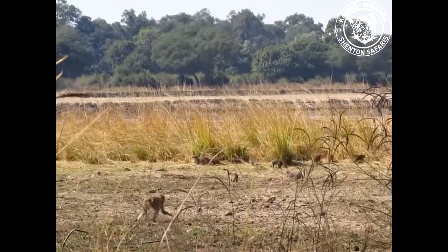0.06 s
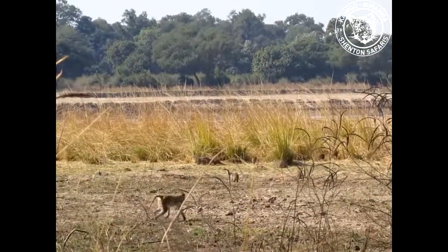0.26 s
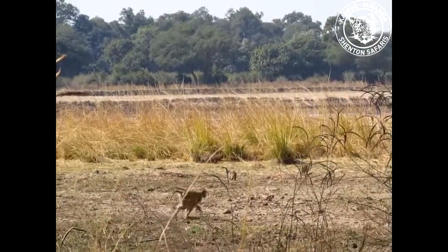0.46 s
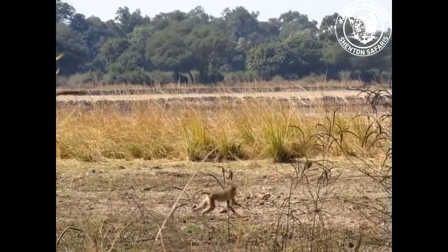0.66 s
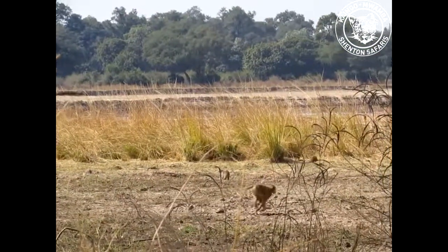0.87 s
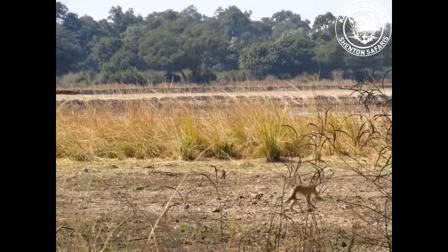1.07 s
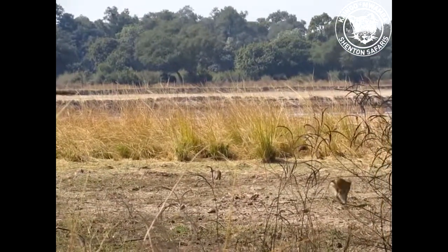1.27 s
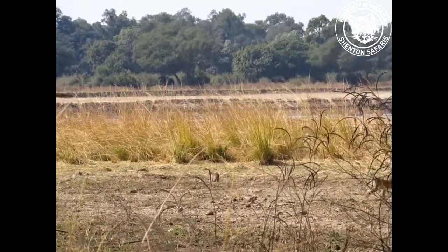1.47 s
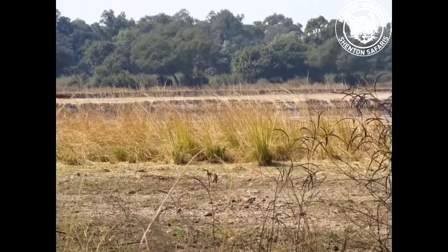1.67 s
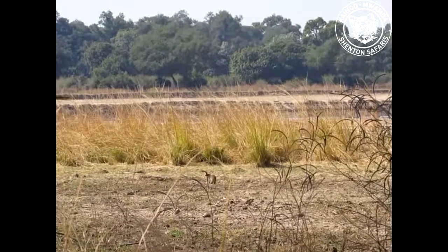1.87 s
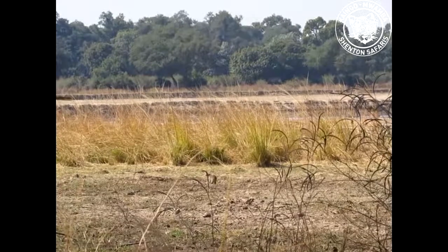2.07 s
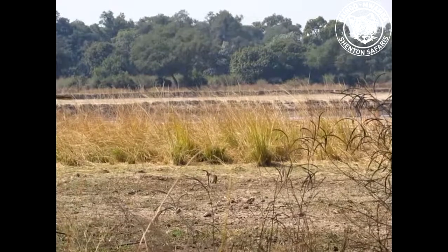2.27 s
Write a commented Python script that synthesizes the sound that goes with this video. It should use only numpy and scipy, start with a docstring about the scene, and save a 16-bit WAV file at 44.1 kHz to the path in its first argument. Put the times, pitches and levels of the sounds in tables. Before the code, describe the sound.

A bird close on the left gives six sharp, whistled chirps, the last three quieter, each echoing briefly off the bush. Light wind hisses through open grassland, with faint cooing far away and soft puffs on the microphone.

```python
"""A bird close by on the left gives six sharp chirps in open savanna. Each is a whistle that starts
with a rough snap, arches up in pitch and dives, then scatters back from the bush as echoes.
Far off are a few faint calls (gliding tones) and a steady chorus of low cooing (bands of noise).
Light wind hisses in the grass and nudges the microphone with soft, low puffs."""
import sys
import numpy as np
from scipy import signal
from scipy.fft import rfft, irfft
from scipy.io import wavfile

SR = 44100
rng = np.random.default_rng(int(sys.argv[2]) if len(sys.argv) > 2 else 0)


def to_wav(sig):
    """Store sig (one row per channel, or 1-D mono) as 16-bit WAV at the path in sys.argv[1].

    Samples outside -1..1 are clipped; the rate is SR.
    """
    pcm = np.clip(np.atleast_2d(sig), -1, 1) * 32767
    pcm = np.round(pcm).astype(np.int16)
    wavfile.write(sys.argv[1], SR, pcm.T)  # frames by channels


N = 101429

# The near bird's chirps. Overtones are tones at 2, 3 and 4 times the pitch of the base tone.
# (start [s], peak time [s], end [s], start pitch [Hz], peak pitch [Hz], level [dB],
#  swell in the rise [dB], fade in the dive [dB], overtone gain [dB], step per further overtone [dB],
#  snap gain [dB], left minus right [dB], echo of base tone and snap [dB], echo of overtones [dB])
CHIRPS = [(.2192, .257, .293, 2780, 3335, -14, 10, 20, 2, -1, -13, 9, -3, -1),
          (.8060, .850, .885, 2680, 3320, -14, 21, 19, -6, 0, -17, 11, -5, 3),
          (.9842, 1.005, 1.037, 2790, 3130, -19, 1, 10, 3, 2, -7, 9, -3, -4),
          (1.5368, 1.582, 1.622, 2420, 3265, -22, 0, 0, -3, -4, -11, 6, 0, 2),
          (1.7270, 1.749, 1.781, 2620, 3060, -28, -2, -3, -1, -1, -10, 6, 2, 4),
          (1.9040, 1.926, 1.960, 2660, 3040, -29, -2, -4, -1, -1, -10, 6, 3, 5)]
# How loud the chirp's tones sound at each frequency, as coloured by bird and microphone:
# (frequency [Hz], gain [dB])
CHIRP_COLOUR = [(1600, -13), (2400, -8.5), (3200, -2), (3650, -10), (4000, -21), (4500, -27.5),
                (5400, -12.5), (6400, -15.5), (7800, -23), (9100, -24), (10100, -39.5), (12400, -34.5),
                (13200, -51)]
# Distant calls: (start [s], length [s], start pitch [Hz], middle pitch [Hz], end pitch [Hz], level [dB])
FAR_CALLS = [(1.037, .11, 1946, 1950, 1550, -48), (1.984, 0.042, 790, 833, 750, -43.5),
             (2.021, 0.071, 700, 626, 543, -57)]
# Bands of distant cooing: (pitch [Hz], width [Hz], level [dB])
COO_BANDS = [(278, 35, -68.5), (486.6, 34, -61.5), (530, 64, -60.5), (680.7, 55, -52.5)]
# Tone colour of the wind in the grass: (frequency [Hz], relative level [dB])
WIND_SPECTRUM = [(25, -6), (70, -9.5), (150, -1), (250, -3), (400, 0), (560, -7), (800, -1), (1020, -6.5),
                 (1300, -4.5), (1600, -10), (2400, -10), (3200, -10.5), (3900, -16), (5000, -17.5),
                 (7000, -19), (10000, -24.5), (12500, -25.5), (14500, -40)]
# How alike that wind is on the left and right: (frequency [Hz], likeness [-1 opposite to 1 same])
WIND_LIKENESS = [(30, -0.84), (150, -0.95), (350, -0.86), (550, -1.16), (800, -0.21), (1400, -0.052),
                 (3000, 0.46), (12000, -0.077)]
# Puffs of wind on the microphone: (peak time [s], level [dB])
WIND_PUFFS = [(1.32, -51), (1.74, -53.5), (1.89, -38), (2.25, -49.5)]
# Narrow bands that the microphone misses: (frequency [Hz], width [Hz])
MIC_DIPS = [(3980, 216), (7930, 180)]

T = np.arange(N) / SR  # time of each sample [s]
BIN_HZ = np.maximum(np.arange(N + 1) * SR / (2 * N), 1)  # frequencies at which noise is shaped


def bird():
    """The bird snaps and whistles. Returns the direct sound and the sound that spreads into the bush."""
    direct, spread = np.zeros((2, N)), np.zeros(N)
    wobbles = drift(320), drift(50), drift(200)
    rasp = 1 + amp(-41) * drift(1000)
    noise = rng.standard_normal(N)
    for (start, peak, end, start_hz, peak_hz, db, swell_db, fade_db,
         overtone_db, step_db, snap_db, pan_db, echo_db, upper_echo_db) in CHIRPS:
        base, *overtones = rasp * whistle(start, peak, end, start_hz, peak_hz, swell_db, fade_db, wobbles)
        lower = base + amp(snap_db) * snap(start, noise)
        upper = sum(amp(overtone_db + k * step_db) * tone for k, tone in enumerate(overtones))
        direct += amp(db) * pan(pan_db) * (lower + upper)
        spread += amp(db + echo_db) * lower + amp(db + upper_echo_db) * upper
    return direct, spread


def whistle(start, peak, end, start_hz, peak_hz, swell_db, fade_db, wobbles):
    """A base tone and three overtones arch up in pitch, then dive; their strength varies with pitch."""
    end_hz, attack_s, release_s = 1534.5, 0.0024, 0.0023
    waver, flutter, shimmer = wobbles  # of the pitch, the level and the overtones' level
    rise_left = np.clip((peak - T) / (peak - start), 0, 1)
    dive = np.clip((T - peak) / (end - peak), 0, 1)
    arch_hz = peak_hz - (peak_hz - start_hz) * rise_left ** 1.55 - (peak_hz - end_hz) * dive ** 2.1
    hz = arch_hz * (1 + .0035 * waver)
    gate = np.clip((T - start) / attack_s, 0, 1) * np.clip((end - T) / release_s, 0, 1)
    on = gate > 0
    phase = 2 * np.pi * np.cumsum(hz[on]) / SR
    base_db = -swell_db * rise_left[on] ** 2
    shared_db = 0.6 * flutter[on] - fade_db * dive[on] ** 2.28  # the fade comes late in the dive
    # Overtones waver more, follow only part of the swell and die first in the dive.
    upper_db = 3 * shimmer[on] + 0.55 * base_db - 3.5 * dive[on]
    tones = np.zeros((4, N))
    for k, tone in enumerate(tones, 1):
        db = at_hz(CHIRP_COLOUR, k * hz[on]) + shared_db + (upper_db if k > 1 else base_db)
        tone[on] = amp(db) * np.sin(k * phase)
    return tones * gate


def snap(start, noise, decay_s=0.0033, band_hz=(1870, 7400)):
    """A brief, rough click as the voice catches at the start of a chirp."""
    burst = noise * (T >= start) * np.exp(-np.abs(T - start) / decay_s)
    return cut(burst + 1e-18, band_hz, "band")


def bush_echoes(sound, first_echo_s=0.0045, build_s=0.026, near_per_s=4200, treble_hz=4700):
    """Nearby brush sends back separate early echoes; a long, smooth tail builds up behind them."""
    age = np.maximum(T - first_echo_s, 0)

    def echoes(shape, ring_s):
        """Random reflections that fall by 60 dB in ring_s; energy 1 on each side."""
        train = rng.standard_normal((2, N)) * shape * amp(-60 * age / ring_s)
        return train / np.sqrt(np.sum(train ** 2, axis=1, keepdims=True))

    build = 1 - np.exp(-age / build_s)
    arrivals = (rng.random((2, N)) < near_per_s / SR) * (age > 0)
    near = amp(-3.5) * pan(6) * echoes(arrivals, ring_s=0.34)  # the nearest brush is on the bird's side
    tail = amp(-4) * cut(echoes(build, ring_s=0.75), treble_hz, "low")
    treble = amp(-4.5) * cut(echoes(build, ring_s=0.48), treble_hz, "high")  # treble dies sooner
    response = cut(near + tail + treble, hz=2470, kind="high")  # leaves scatter high tones best
    return signal.fftconvolve(sound[None], response, axes=1)[:, :N]


def far_calls():
    """Far birds give faint, arched notes, blurred by distance."""
    calls = np.zeros(N)
    blur = 1 + .022 * drift(123)  # a quick wobble in pitch
    for start, length, start_hz, middle_hz, end_hz, db in FAR_CALLS:
        progress = np.clip((T - start) / length, 0, 1)
        arch = np.polyfit([0, .5, 1], [start_hz, middle_hz, end_hz], 2)
        hz = np.polyval(arch, progress) * blur
        calls += amp(db) * np.sin(np.pi * progress) * np.sin(2 * np.pi * np.cumsum(hz) / SR)
    return calls


def cooing_chorus():
    """Many far cooing voices blur into a few narrow, wavering bands, a little to the right."""
    voices = np.zeros((2, N))
    for pitch, width, db in COO_BANDS:
        band = 1 / (1 + ((BIN_HZ - pitch) / width * 1.5) ** 2)
        voices += amp(db + 2.1 * drift(2.3)) * stereo_noise(band, likeness=.7)
    return pan(-2.5) * voices


def grass_wind(level_db=-47.5):
    """Light wind hisses steadily in the grass and trees."""
    colour = amp(at_hz(WIND_SPECTRUM, BIN_HZ))
    return amp(level_db + .5 * drift(12)) * stereo_noise(colour, at_hz(WIND_LIKENESS, BIN_HZ))


def wind_puffs(rise_s=0.053, fall_s=0.064, centre_hz=34.6, half_width_hz=40):
    """Soft, low puffs on the microphone push its two sides in opposite directions."""
    swell = sum(amp(db) * np.exp(-np.maximum((peak - T) / rise_s, (T - peak) / fall_s))
                for peak, db in WIND_PUFFS)
    low_band = 1 / (1 + ((BIN_HZ - centre_hz) / half_width_hz) ** 4)
    return swell * stereo_noise(low_band, likeness=-.95)


def amp(db):
    """Turn decibels into a gain to multiply by."""
    return 10 ** (np.asarray(db) / 20)


def unit(x):
    """Scale a signal to an average strength (rms) of 1."""
    return x / np.sqrt(np.mean(x ** 2) + 1e-20)


def at_hz(points, hz):
    """Read between the rows of a table, on a log-frequency axis."""
    frequencies, values = np.transpose(points)
    return np.interp(np.log(hz), np.log(frequencies), values)


def drift(rate_hz):
    """A smooth random wobble of strength 1; a higher rate makes it quicker."""
    pole = np.exp(-2 * np.pi * rate_hz / SR)
    return unit(signal.lfilter([1], [1, -2 * pole, pole * pole], rng.standard_normal(2 * N))[N:])


def pan(db):
    """Left and right gains; positive decibels move the sound to the left."""
    return amp(np.array([[db / 2], [-db / 2]]))


def stereo_noise(colour, likeness):
    """Noise of strength 1 with a given tone colour and likeness between left and right."""
    mid, side = rfft(rng.standard_normal((2, 2 * N)))
    likeness = np.clip(likeness, -.99, .99)
    spectrum = np.sqrt(1 + likeness) * mid + np.sqrt(1 - likeness) * side * [[1], [-1]]
    return unit(irfft(colour * spectrum)[:, :N])


def cut(x, hz, kind):
    """A filter that keeps the "low" part, the "high" part or one "band" of a sound."""
    return signal.sosfilt(signal.butter(3, hz, kind, fs=SR, output="sos"), x)


def scene():
    """Add up the bird, its echoes, the far voices and the wind."""
    direct, spread = bird()
    return direct + bush_echoes(spread) + far_calls() + grass_wind() + cooing_chorus() + wind_puffs()


def record(dry):
    """The microphone has two narrow dips, and the highest treble is cut steeply."""
    cutoff_hz = 14500
    for hz, width in MIC_DIPS:
        dry = signal.lfilter(*signal.iirnotch(hz, hz / width, fs=SR), dry)
    return signal.sosfilt(signal.ellip(10, .1, 80, cutoff_hz, fs=SR, output="sos"), dry)


dry = scene()
out = record(dry)
to_wav(out)
```